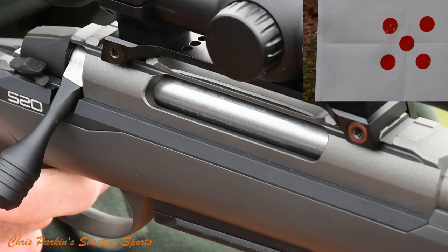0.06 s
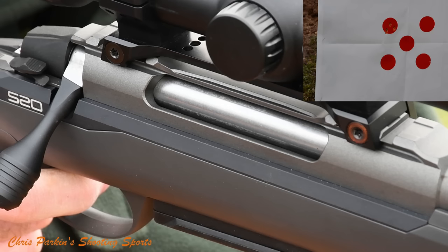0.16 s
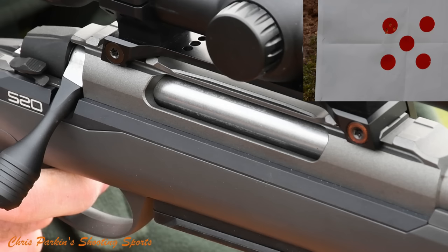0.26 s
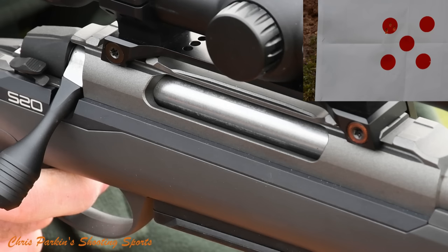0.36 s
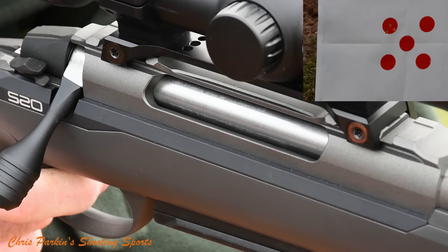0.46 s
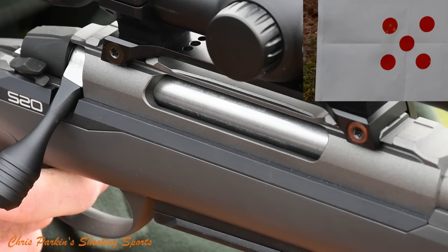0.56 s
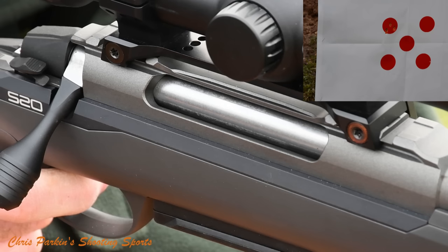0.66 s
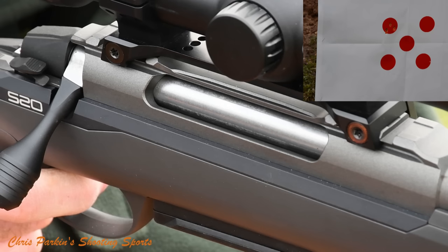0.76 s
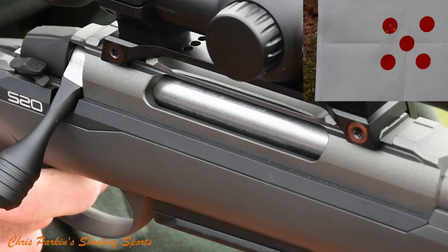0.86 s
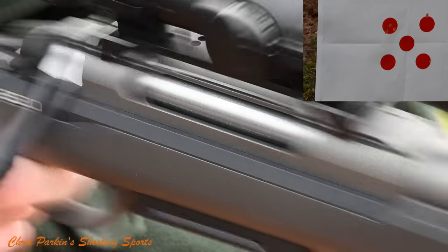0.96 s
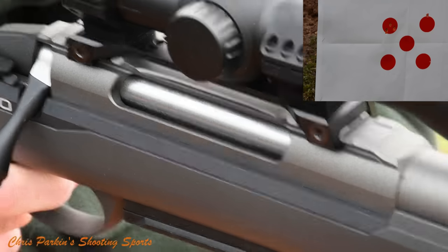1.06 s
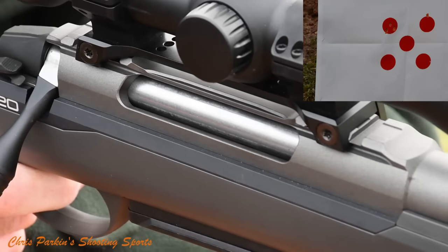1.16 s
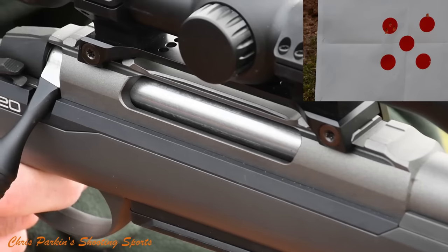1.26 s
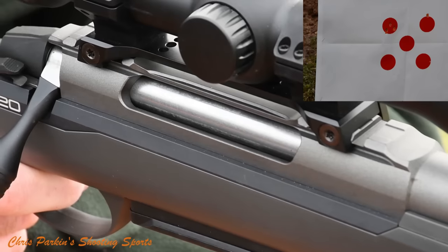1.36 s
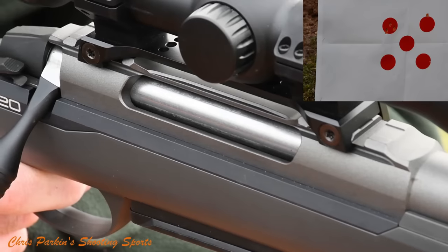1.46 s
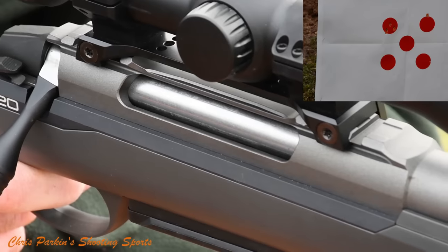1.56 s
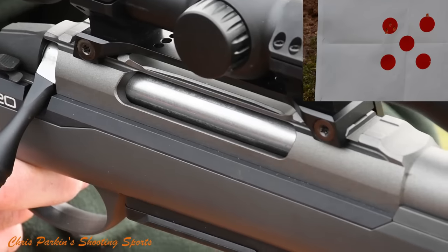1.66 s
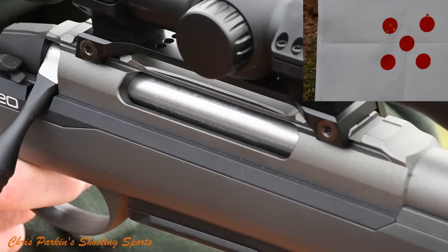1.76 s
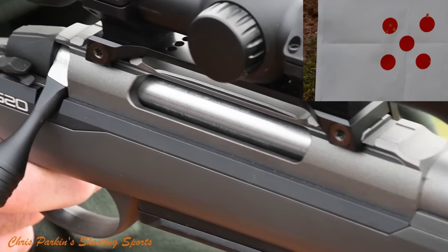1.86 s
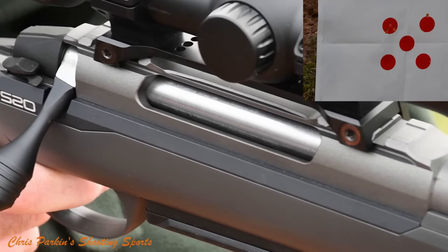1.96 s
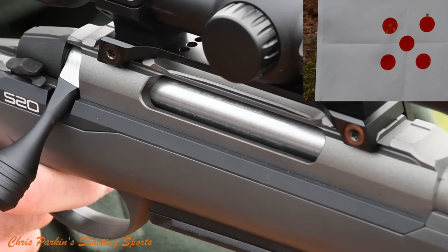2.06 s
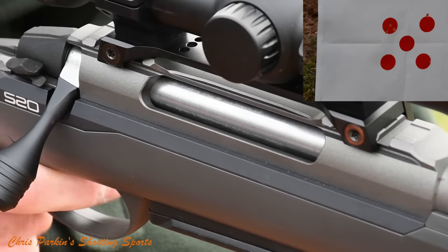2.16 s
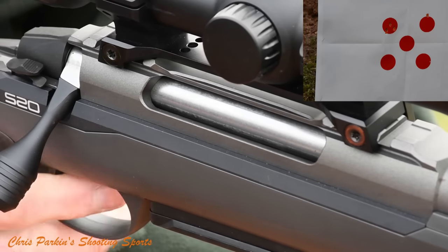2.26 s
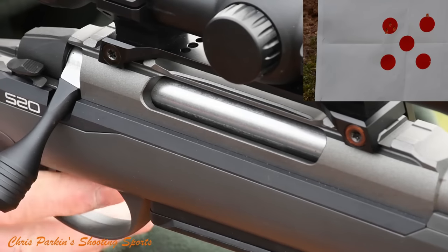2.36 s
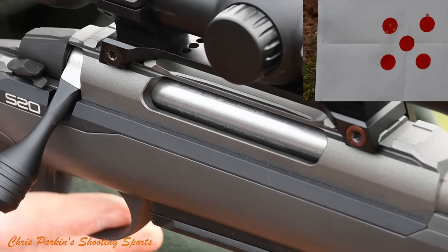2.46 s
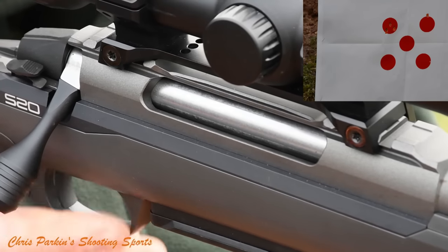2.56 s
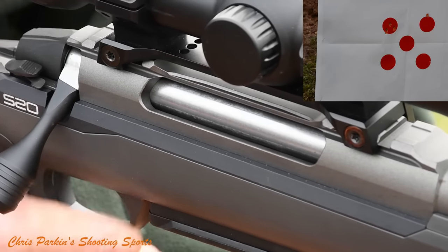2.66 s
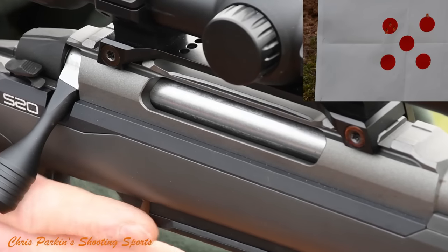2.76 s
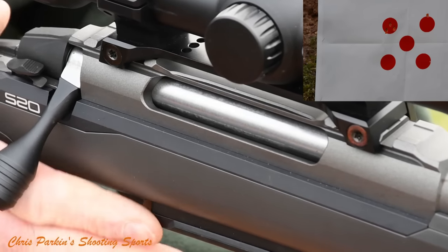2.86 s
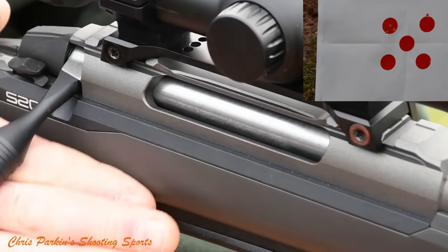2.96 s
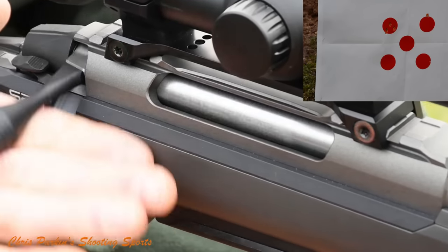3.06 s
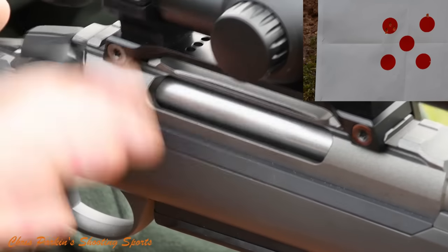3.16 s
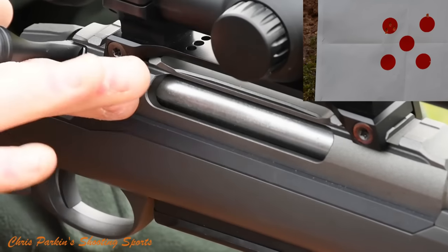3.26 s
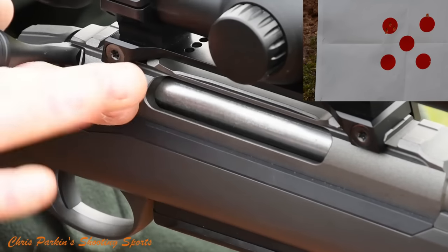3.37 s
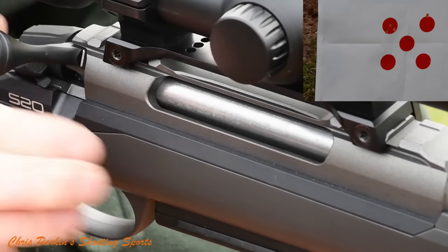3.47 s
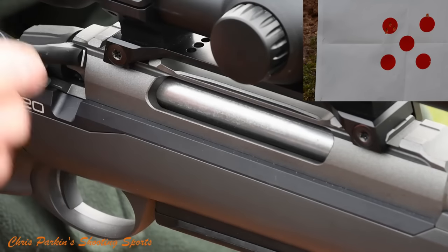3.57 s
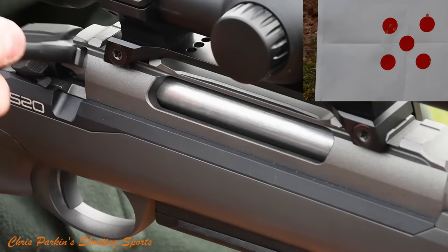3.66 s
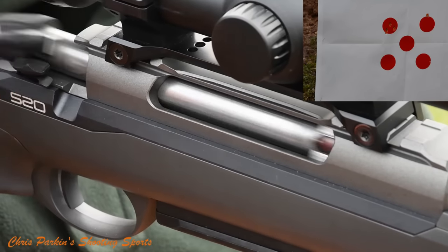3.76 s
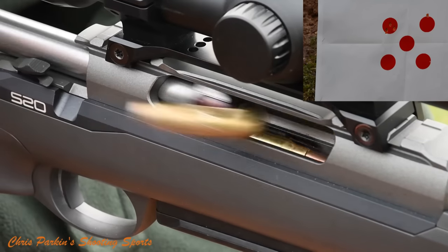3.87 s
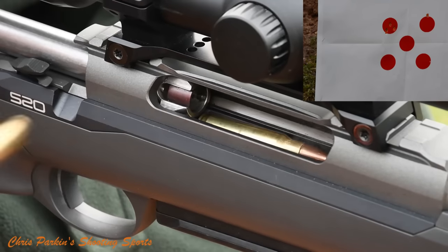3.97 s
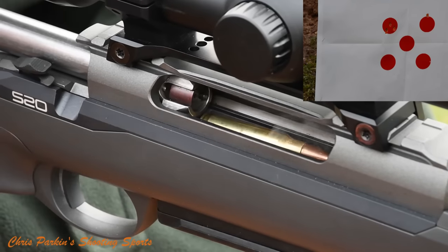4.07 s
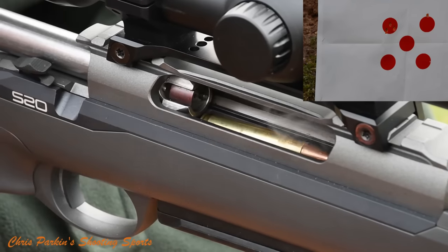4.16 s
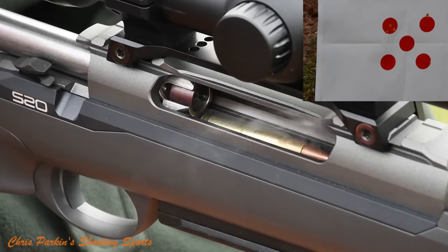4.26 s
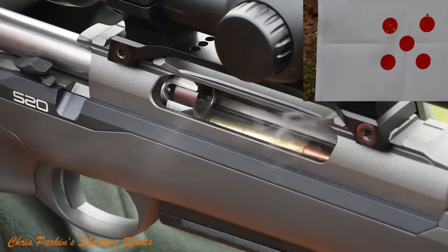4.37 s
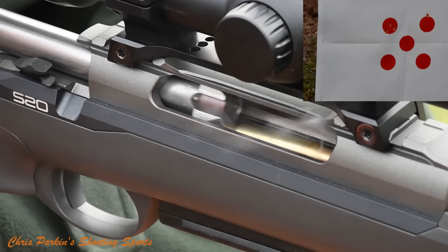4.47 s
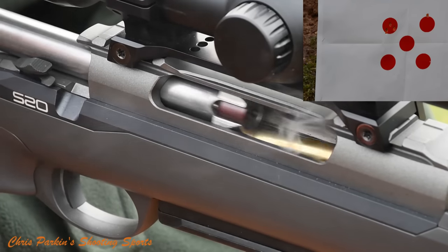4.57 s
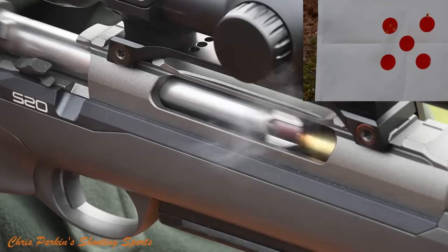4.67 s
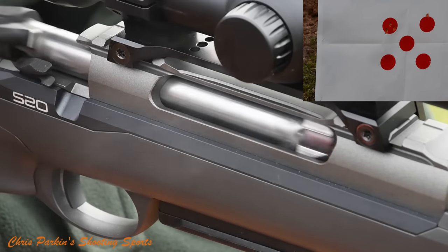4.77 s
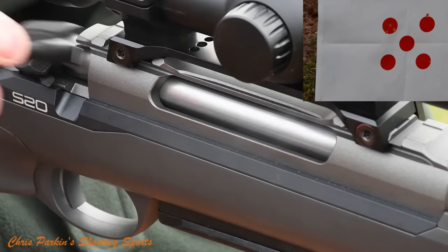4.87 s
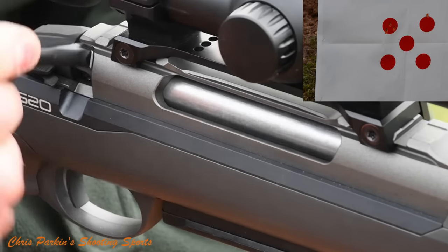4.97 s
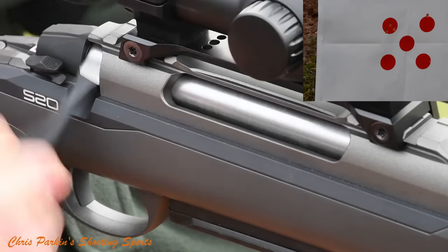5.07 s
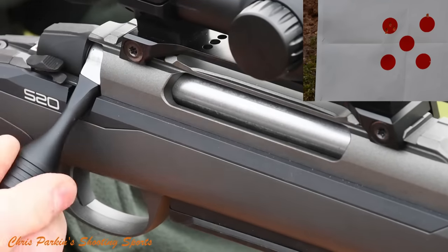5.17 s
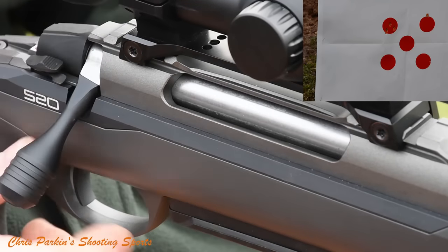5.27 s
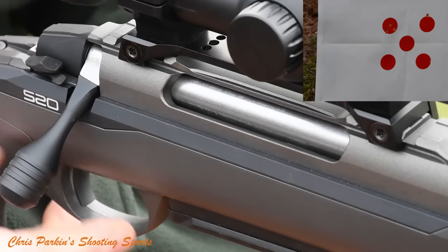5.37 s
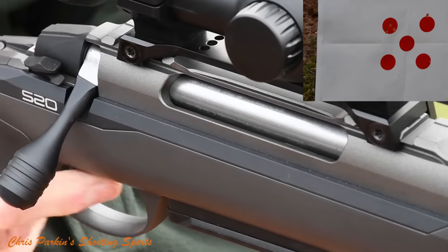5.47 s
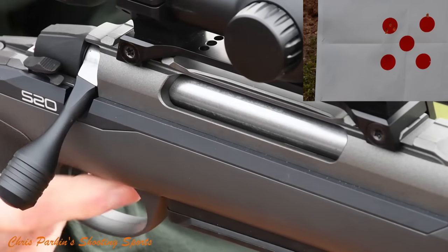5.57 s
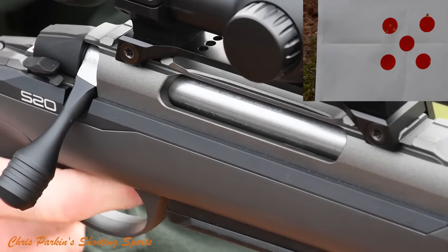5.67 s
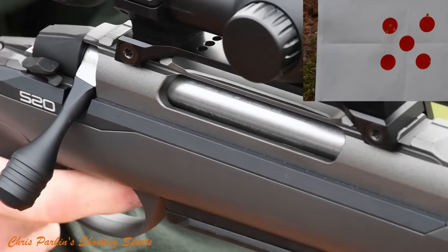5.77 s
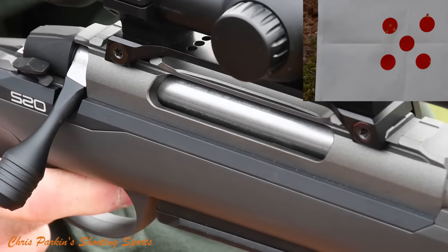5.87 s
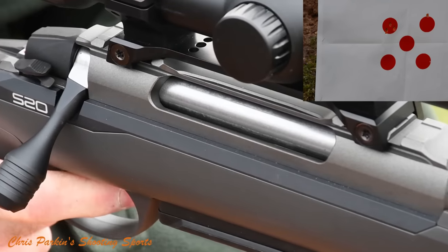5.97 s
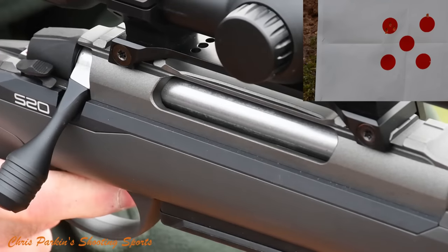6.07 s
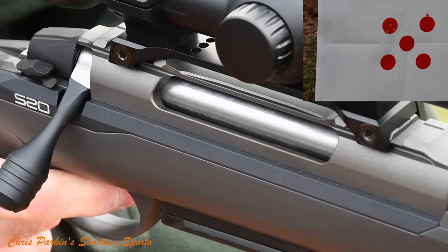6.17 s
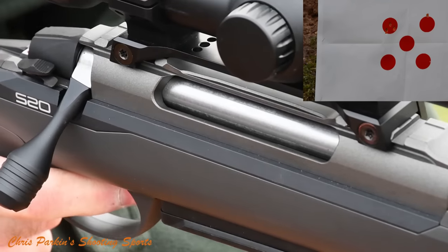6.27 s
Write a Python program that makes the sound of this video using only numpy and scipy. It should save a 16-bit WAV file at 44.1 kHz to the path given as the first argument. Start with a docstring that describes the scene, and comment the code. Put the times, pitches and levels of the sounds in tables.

```python
"""Rifle shot and bolt cycling outdoors

One shot heard from beside the action: noise bursts make the blast, overloading the microphone. Scattered
grains, ever duller, are the return from trees and banks; short pulses are single echoes and low thumps.
The bolt is then lifted, drawn back, pushed home over a fresh brass round and locked: ringing steel modes,
clicks and rubbing grains. Shaped noise gives a soft outdoor rumble throughout."""
import sys
import numpy as np
from scipy import signal
from scipy.fft import rfft, irfft
from scipy.io import wavfile
from scipy.ndimage import uniform_filter1d

SR = 44100
rng = np.random.default_rng(int(sys.argv[2]) if len(sys.argv) > 2 else 0)


def wrap_up_sound(samples):
    """Save the sound to the file named by the first command line argument, as 16-bit audio."""
    columns = np.atleast_2d(samples).T
    # keep every value between -1 and 1, then stretch to whole-number steps
    tamed = np.clip(columns, -1, 1)
    steps = np.round(tamed * 32767).astype(np.int16)
    wavfile.write(sys.argv[1], SR, steps)


N = 279153
T = np.arange(N) / SR
HIT_T = T[:SR // 4]  # time axis of one short event
SHOT_S = 1.003

# high modes of the small steel parts: f/Hz, relative level/dB, t60/s
STEEL_MODES = [(2626, 5.5, 0.027), (3440, 5, 0.0077), (4530, 6, 0.006), (5530, -5.5, 0.011),
               (5880, 3.5, 0.013), (6670, 6.5, 0.0081), (7260, 5, 0.01), (8760, 8.5, 0.0035),
               (9880, 9.5, 0.0037), (12800, 3, 0.0039)]


def undb(db):
    """Decibels to amplitude gain."""
    return 10 ** (np.asarray(db) / 20)


def unit(x):
    """Scale to rms 1."""
    return x / np.sqrt(np.mean(x ** 2))


def colour(x, points):
    """Filter x by a response of (f/Hz, dB) points, linear in log f, then scale to rms 1."""
    hz, db = np.transpose(points)
    f = np.fft.rfftfreq(len(x), 1 / SR) + 1
    gain = undb(np.interp(np.log(f), np.log(hz), db))
    return unit(irfft(rfft(x) * gain, len(x)))


def bell(f, hz, octaves):
    """Gaussian weight around hz on an octave scale."""
    return np.exp(-.5 * (np.log2((f + 1) / hz) / octaves) ** 2)


def band(x, lo_hz, hi_hz, order=2):
    """Causal Butterworth band-pass."""
    edges_hz = [lo_hz, min(hi_hz, SR / 2 - 1)]
    return signal.sosfilt(signal.butter(order, edges_hz, "band", fs=SR, output="sos"), x)


def fade(t, t60):
    """Exponential decay from t = 0, down 60 dB at t60 seconds."""
    return np.exp(-np.log(1000) * np.maximum(t, 0) / t60)


def envelope(t, rise_s, hold_s, t60):
    """Rise from t = 0, hold until hold_s, then die away."""
    return np.clip(t / rise_s, 0, 1) * fade(t - hold_s, t60)


def walk(rate_hz):
    """Random wander with a spread near 1, interpolated between rate_hz knots per second."""
    knots = rng.standard_normal(int(N / SR * rate_hz) + 2)
    return np.interp(T * rate_hz, np.arange(len(knots)), knots)


def grains(spread_db, size=N):
    """Dense tiny impulses of uneven size."""
    sizes = undb(spread_db * rng.standard_normal(size))
    return unit(rng.standard_normal(size) * sizes)


def ring(modes, weights=1):
    """Free ringing: a sum of decaying sines, one per mode."""
    hz, db, t60 = np.transpose(modes)
    sines = np.sin(2 * np.pi * hz[:, None] * HIT_T)
    return (undb(db) * weights) @ (sines * fade(HIT_T, t60[:, None]))


def add(out, s, x):
    """Mix x into out at time s."""
    i = int(s * SR)
    out[i:i + len(x)] += x[:len(out) - i]


def burst(x, db, span_s=0.011):
    """Scale a short sound so that its energy equals rms level db held for span_s."""
    return x * undb(db) / np.sqrt(np.sum(x ** 2) / (span_s * SR))


def swings(rows):
    total = 0
    for s, hz, width_s, db in rows:
        age = T - s
        total = total + undb(db) * np.sin(2 * np.pi * hz * age) * np.exp(-(age / width_s) ** 2)
    return total


def outdoors(drone_db=-52):
    """Far rumble and soft hiss that wander slightly in level, with a steady low drone."""
    # outdoor background: f/Hz, relative density/dB
    air_points = [(15, -60.5), (25, -25.5), (46, -11), (66, 1.5), (91, -6.5), (126, -4), (227, -6.5),
                  (281, -8.5), (313, -5.5), (368, -14.5), (847, -12.5), (1300, -18), (1490, -22),
                  (2770, -36), (15500, -40.5)]
    level_db = -42 + .5 * walk(4.4)
    air = colour(rng.standard_normal(N), air_points) * undb(level_db)
    drone = unit(band(rng.standard_normal(N), 59, 69))
    return air + undb(drone_db) * drone


def returns(ground_db=-8, ground_t60=0.75):
    """Scatter strength: the ground answers at once, then each belt of trees; powers add."""
    # belts of trees, near to far: first return t/s, level before air loss/dB
    belts = [(1.102, -3.5), (1.173, -8.5), (1.359, -19.5), (2.1, -36)]
    rise, hold, t60 = 0.18, 0.43, 5.55  # s per s of delay: farther belts are more drawn out
    power = (undb(ground_db) * fade(T - SHOT_S, ground_t60) * (T > SHOT_S)) ** 2
    for s, db in belts:
        delay_s = s - SHOT_S
        swell = envelope(T - s, rise * delay_s, hold * delay_s, t60 * delay_s)
        power = power + (undb(db) * swell) ** 2
    return np.sqrt(power)


def landscape(air_db_per_khz_s=5.0, rumble_db=-28, rumble_t60=3.4, patchy_db=1.0, flutter_db=1.0):
    """Countless small reflections; air takes more treble the later they come. Lows roll on."""
    # tone before air loss: f/Hz, relative level/dB
    scatter_points = [(100, -25.5), (250, -6.5), (500, -2.5), (900, 1), (1700, 2), (3200, 0), (6000, -6),
                      (8800, -9), (9800, -16.5), (15500, -22)]
    f, t, cells = signal.stft(colour(grains(4.0), scatter_points), SR, nperseg=512)
    loss_db = air_db_per_khz_s * np.outer(f / 1000, np.maximum(t - SHOT_S, 0))
    # random patchiness over time and frequency makes the scatter slightly uneven
    patches = uniform_filter1d(rng.standard_normal(cells.shape), size=3, axis=1)
    patches = unit(uniform_filter1d(patches, size=7, axis=0))
    scatter = signal.istft(cells * undb(patchy_db * patches - loss_db), SR)[1][:N]
    scatter = scatter * returns() * undb(flutter_db * walk(140))
    rumble = unit(band(rng.standard_normal(N), 105, 340))
    rumble = rumble * fade(T - SHOT_S, rumble_t60) * (T > SHOT_S)
    return scatter + undb(rumble_db) * rumble


def echoes():
    """Single echoes from banks and slopes, each a short pressure pulse."""
    # centre t/s, f/Hz, 1/e half-width/s, sine level before the Gaussian/dB
    return swings([(1.257, 1730, 0.0024, -2), (1.451, 350, .0019, 0.5), (1.4632, 338, .0023, -9.5),
                   (1.4697, 380, 0.0027, -15), (1.626, 1520, 0.0012, -16.5), (1.6282, 230, .0028, -19),
                   (1.8664, 280, 0.0026, -17.5), (2.0466, 264, 0.0039, -24.5)])


def contact(length_s, tail_db=-30, tail_t60=0.1):
    """A blow swells and breaks up into tiny impacts; nearby surfaces add a faint tail."""
    age = HIT_T / max(length_s, 1 / SR)
    press = np.sqrt(age) * np.exp(1 - age)
    return grains(3.1, size=len(HIT_T)) * (press + undb(tail_db) * fade(HIT_T, tail_t60))


def struck(hz, octaves):
    """The action's modes near hz ring, each with a random sign."""
    # stock, receiver and bolt: f/Hz, relative level/dB, t60/s
    action_modes = [(166.5, 3.5, 0.05), (242, -4, 0.097), (333, 2, 0.089), (425, 1.5, 0.058),
                    (580.4, 0, 0.09), (670, 6, 0.035), (780, 6, 0.055), (838, 3, 0.05), (1016, 2.5, 0.042),
                    (1134, 0.5, 0.053), (1248, 3.5, 0.037), (1528, 4, 0.026), (1626, 1.5, 0.018),
                    (1820, 3.5, 0.045), (2100, -1, 0.035), (2440, -6, 0.035), (2885, 0, 0.043)]
    signs = rng.choice([-1, 1], len(action_modes))
    reach = bell(np.array(action_modes)[:, 0], hz, octaves)
    return unit(ring(action_modes, signs * reach))


def metallic(force, dry_share=1.0):
    """A contact heard directly and through the ringing small steel parts."""
    rung = signal.fftconvolve(force, ring(STEEL_MODES))[:len(force)]
    return unit(rung) + dry_share * unit(force)


def slide(ring_share=0.2, rise_s=0.012, t60=0.12):
    """Steel catches and slips as the bolt travels or the hand rubs; small parts sing along."""
    # rubs of the bolt in its raceway and of the hand: start t/s, hold end after start/s, level/dB
    strokes = [(3.587, 0.44, -53), (3.945, 0.041, -43), (4.21, .03, -52), (4.63, 0.13, -41),
               (4.669, .03, -29), (4.79, 0.024, -41.5), (4.936, .22, -50.5), (5.595, 0.093, -50.5)]
    # tone of the rubbing: f/Hz, relative level/dB
    rub_points = [(250, -14), (700, 5.5), (1700, 2.5), (3000, -11), (6500, -15), (9000, -25), (15000, -27)]
    slips = grains(4.8) * undb(5.7 * walk(160))
    singing = unit(signal.fftconvolve(slips, ring(STEEL_MODES))[:N])
    effort = sum(undb(db) * envelope(T - s, rise_s, hold_s, t60) for s, hold_s, db in strokes)
    return colour(unit(slips) + ring_share * singing, rub_points) * effort


def pings(rise_s=0.001):
    """Brass case, bolt body and fresh round ring on after being jolted."""
    # modes of each: f/Hz, relative level/dB, t60/s
    case_modes = [(8900, -5, .085), (12020, 1, 0.069), (11930, -19, 0.12), (14390, -9, .065)]
    bolt_modes = [(2942, 3.5, 0.026), (6150, -17, .06)]
    round_modes = [(6120, 1, .04)]
    # jolts of each: t/s, level/dB
    case_jolts = [(3.869, -50), (3.92, -45), (3.951, -41), (4.217, -31.5)]
    bolt_jolts = [(3.846, -40), (3.894, -37), (4.638, -31.5), (4.692, -34), (5.157, -37)]
    round_jolts = [(4.695, -28), (4.795, -40)]
    out = np.zeros(N)
    onset = 1 - np.exp(-HIT_T / rise_s)
    for modes, jolts in ((case_modes, case_jolts), (bolt_modes, bolt_jolts), (round_modes, round_jolts)):
        for s, db in jolts:
            add(out, s, undb(db) * ring(modes) * onset)
    return out


def ticks(tap_trim_db=-1, click_trim_db=1, tap_hz=1300):
    """Light, dry contacts of loose parts and fingers that barely stir the action."""
    # t/s, tap on the action before trim/dB, click before trim/dB
    tick_rows = [(1.505, -55, -29), (1.516, -55, -38), (2.008, -51, -46), (2.115, -54, -46),
                 (2.524, -47, -50.5), (2.812, -54, -53.5), (3.291, -40.5, -39.5), (3.451, -42, -53),
                 (3.6372, -42, -50), (3.7068, -38, -47), (3.927, -48, -45), (3.981, -30, -45),
                 (4.265, -37.5, -65), (4.35, -40, -48), (4.379, -43.5, -52.5), (4.71, -34, -51),
                 (4.792, -40, -50), (4.806, -36, -57), (4.987, -37, -62), (5.094, -39, -50),
                 (5.1803, -32.5, -64), (5.217, -60, -53), (5.324, -41.5, -72), (5.9107, -36.5, -58.5)]
    # faint stray ticks as the fingers work the handle
    stray_count, stray_start_s, stray_end_s, stray_db, scatter_db = 5, 3.4, 3.85, -54, 2
    strays = []
    for when, size in rng.random((stray_count, 2)):
        s = stray_start_s + when * (stray_end_s - stray_start_s)
        strays.append((s, stray_db, stray_db + scatter_db * (2 * size - 1)))
    out = np.zeros(N)
    for s, tap_db, click_db in list(tick_rows) + strays:
        # brighter the more the click outweighs the tap
        hz = 4630 * 2 ** (.012 * (click_db - tap_db))
        click = band(metallic(contact(0.00064), dry_share=6.2), hz / 3.0, hz * 1.35, order=1)
        add(out, s, burst(click, click_db + click_trim_db))
        tap = struck(tap_hz, 0.76) * fade(HIT_T, 0.09)
        add(out, s, burst(tap, tap_db + tap_trim_db))
    return out


def knocks(crack_share=0.51, shudder_db=-14, shudder_t60=0.23, click_hz=4350, sparkle_db=-8):
    """Each steel blow rings the same action; where it lands decides which modes speak most."""
    # handle met, bolt lifted, drawn back, stopped, spent case landing, round fed, bolt home, locked:
    # t/s, ring/dB, ring centre f/Hz, stock thud/dB, click/dB
    blows = [(2.9919, -28.5, 983, -37, -41.5), (3.2047, -23, 1150, -34, -33.5),
             (3.2109, -16, 1260, -28, -23), (3.215, -10, 1320, -14, -16), (3.865, -23, 1470, -31, -28.5),
             (3.9146, -32, 1890, -44, -41.5), (3.9508, -31.5, 1320, -48, -43),
             (3.9624, -11.5, 850, -21, -19), (4.1897, -21.5, 900, -22, -49),
             (4.217, -14, 1560, -20.5, -42.5), (4.2397, -33, 690, -33.5, -42),
             (4.6833, -21, 955, -28.5, -27.5), (4.689, -22.5, 1040, -36, -29),
             (4.7353, -35, 1170, -38, -41), (4.941, -29.5, 930, -50, -31.5),
             (4.944, -25, 1030, -32.5, -29.5), (5.0037, -36, 940, -59, -47), (5.063, -36, 1190, -34.5, -45),
             (5.0788, -38.5, 1670, -45, -41), (5.1354, -15, 1100, -26.5, -24.5)]
    out = np.zeros(N)
    for s, ring_db, hz, thud_db, click_db in blows:
        force = contact(0.002)
        receiver = struck(hz, 0.49) + crack_share * unit(band(force, 440, 2260))
        add(out, s, burst(band(receiver, 580, 4600), ring_db))
        stock = band(struck(465, 0.85), 116, 810)
        add(out, s, burst(stock, thud_db))
        # the bench and rest shudder on a little longer
        shudder = band(rng.standard_normal(len(HIT_T)), 260, 810) * fade(HIT_T, shudder_t60)
        add(out, s, burst(shudder, thud_db + shudder_db))
        click = metallic(force)
        add(out, s, burst(band(click, click_hz / 1.52, click_hz * 1.345, order=3), click_db))
        add(out, s, burst(band(click, 7340, 12500, order=3), click_db + sparkle_db))
    return out


def shoves():
    """The hand shoves the whole rifle at each end of the handle's swing: low pressure pulses."""
    # centre t/s, f/Hz, 1/e half-width/s, sine level before the Gaussian/dB
    return swings([(3.222, 93.6, 0.018, -29.5), (5.1615, 69.3, 0.0058, -25), (5.193, 85.4, 0.012, -36)])


def blast(rise_share=0.078):
    """Shaped noise: shock front, hissing muzzle gas, low boom, slaps from ground and firing point."""
    # also the striker's fall, a lingering hiss and a deep after-swell:
    # t/s, hold/s, t60/s, centre f/Hz, width/octaves, level/dB
    parts = [(1.001, 0.0029, .004, 900, .9, -18), (1.003, 0.0053, .008, 760, .7, 6.5),
             (1.005, .022, 0.048, 4100, 1.2, 1), (1.005, 0.017, .08, 300, .55, -3),
             (1.029, .01, .07, 640, .7, -3), (1.03, .038, .045, 2100, 1.2, -11.5),
             (1.023, 0.093, .35, 7016, 0.53, -24.5), (1.036, 0.037, .2, 80, 0.95, -24.5)]
    out = np.zeros(N)
    f = np.fft.rfftfreq(len(HIT_T), 1 / SR)
    for s, hold_s, t60, hz, octaves, db in parts:
        phases = np.exp(2j * np.pi * rng.random(len(f)))
        turbulence = unit(irfft(phases * bell(f, hz, octaves), len(HIT_T)))
        swell = envelope(HIT_T, rise_share * hold_s, hold_s, t60)
        swell_rms = np.sqrt(np.mean(swell ** 2))
        add(out, s, undb(db) * unit(turbulence * swell) * swell_rms)
    return out


def scene():
    """Everything as it reaches the one microphone."""
    shot = blast() + landscape() + echoes()
    bolt = knocks() + ticks() + pings() + slide() + shoves()
    return (shot + bolt + outdoors())[None]


def record(dry, top_hz=15800):
    """The input clips hard at full scale, then an elliptic low-pass cuts the top."""
    clipped = np.clip(dry, -1, 1)
    return signal.sosfilt(signal.ellip(8, .2, 70, top_hz, fs=SR, output="sos"), clipped)


dry = scene()
out = record(dry)
wrap_up_sound(out)
```